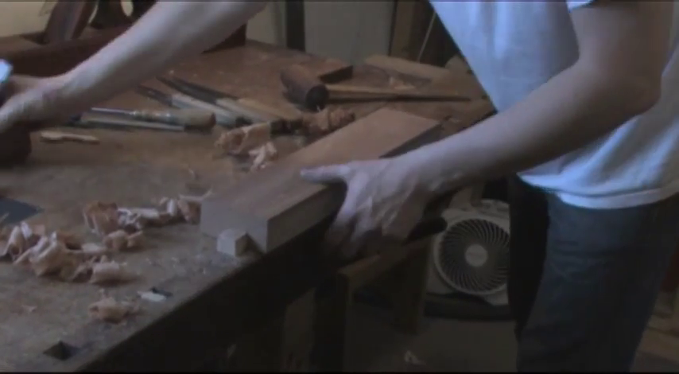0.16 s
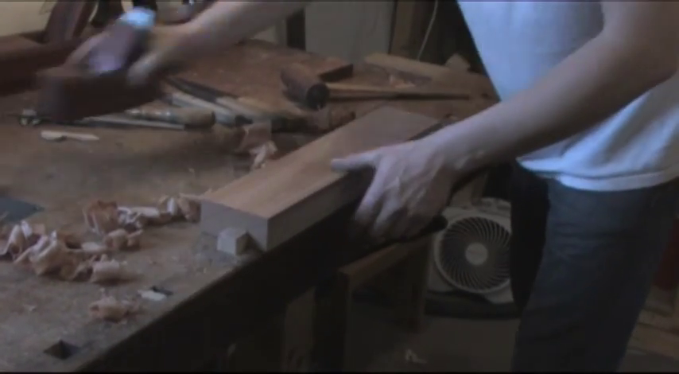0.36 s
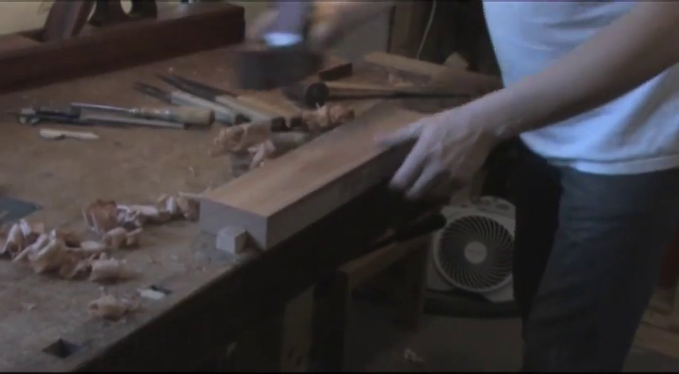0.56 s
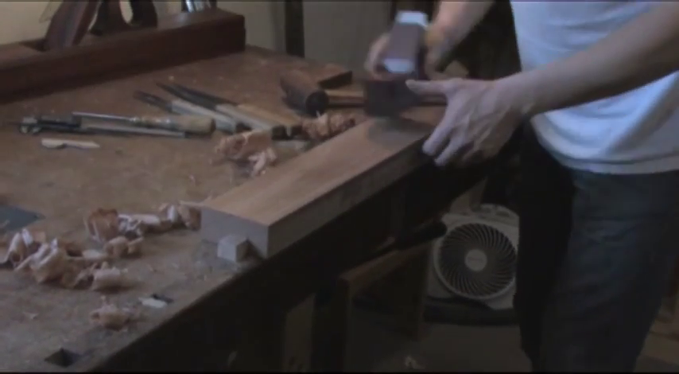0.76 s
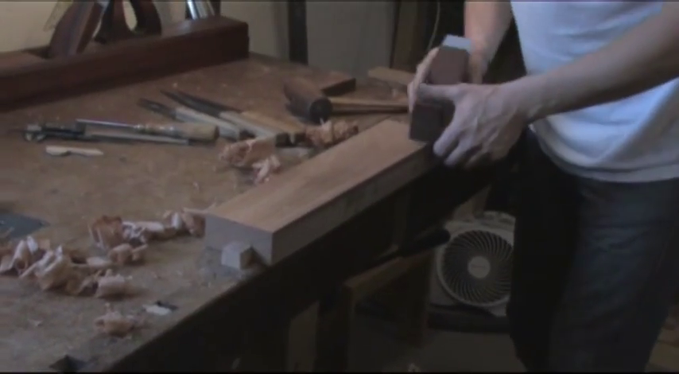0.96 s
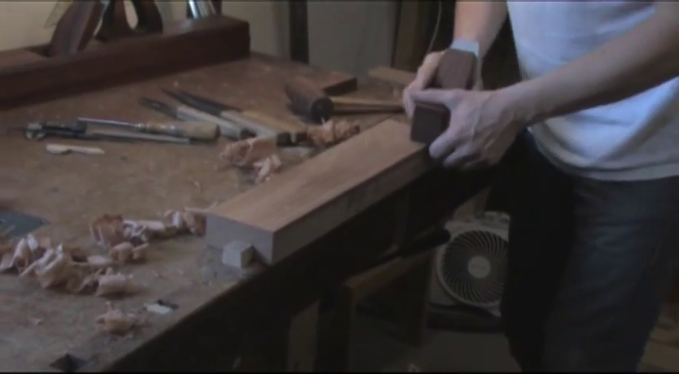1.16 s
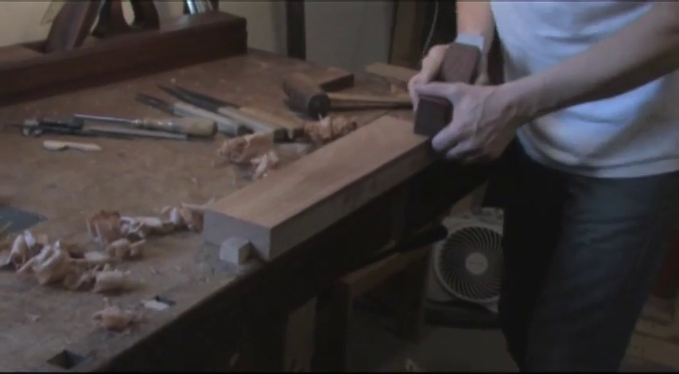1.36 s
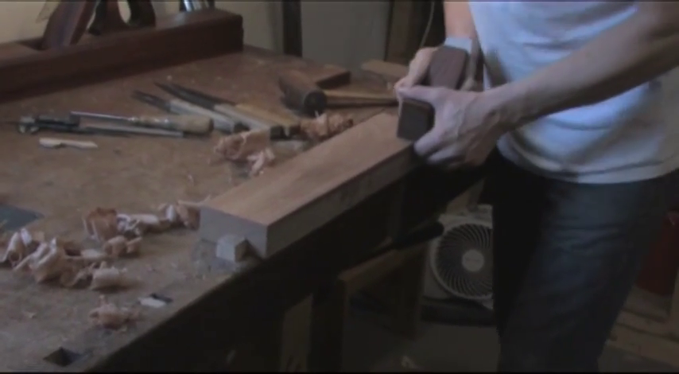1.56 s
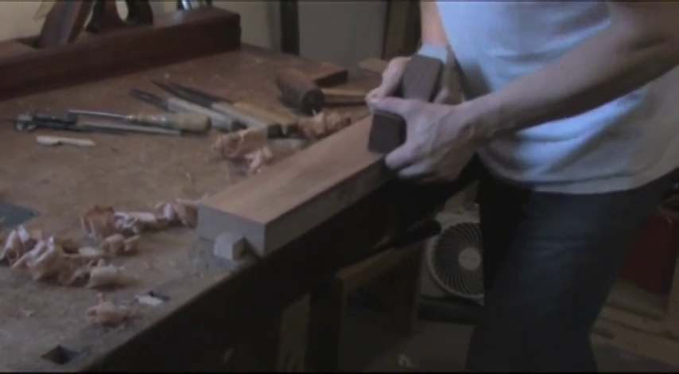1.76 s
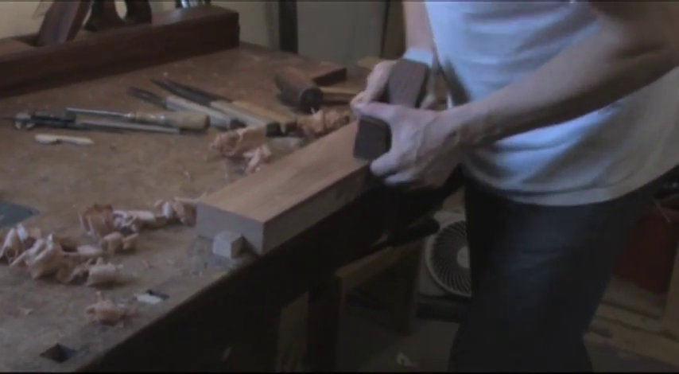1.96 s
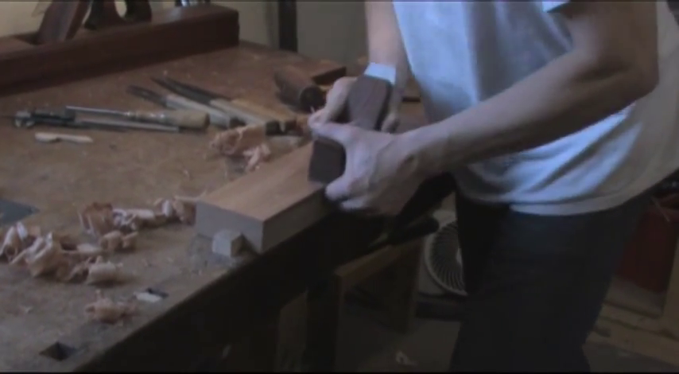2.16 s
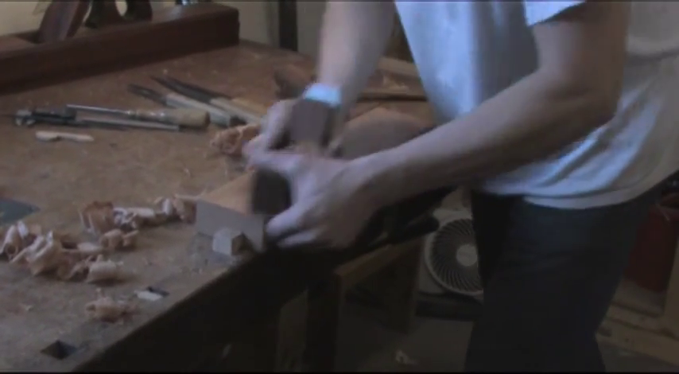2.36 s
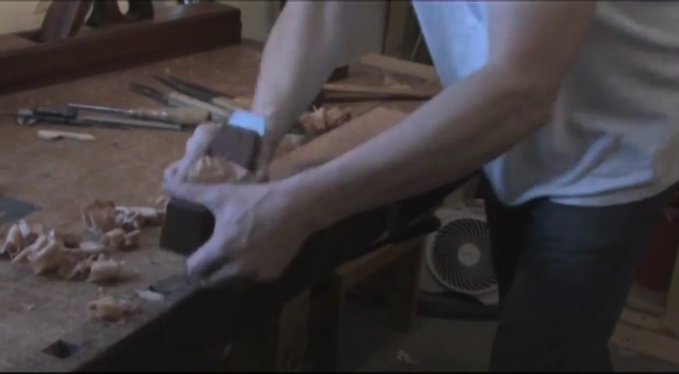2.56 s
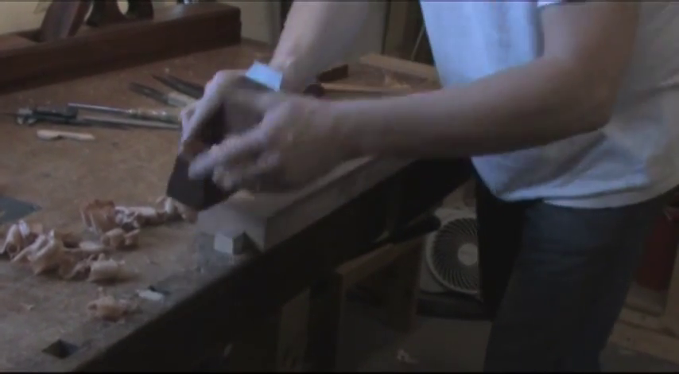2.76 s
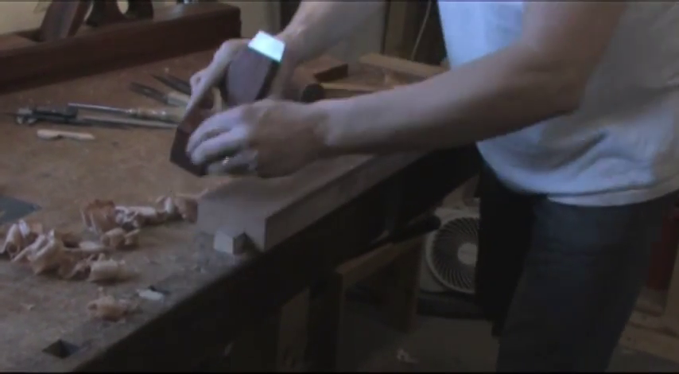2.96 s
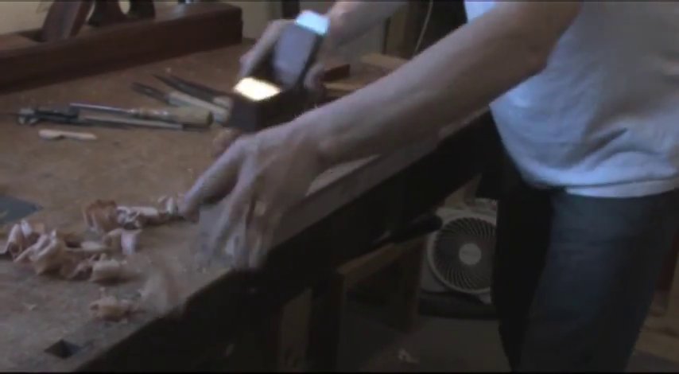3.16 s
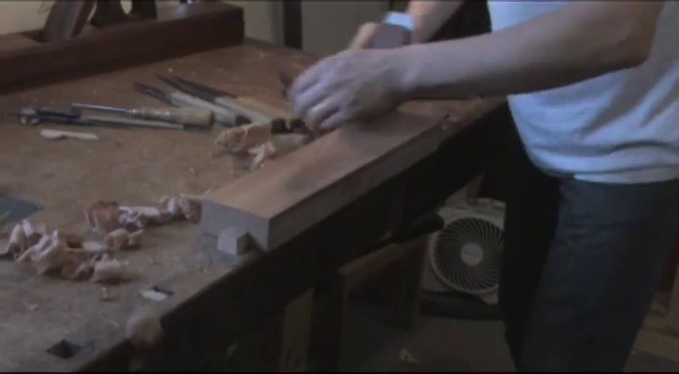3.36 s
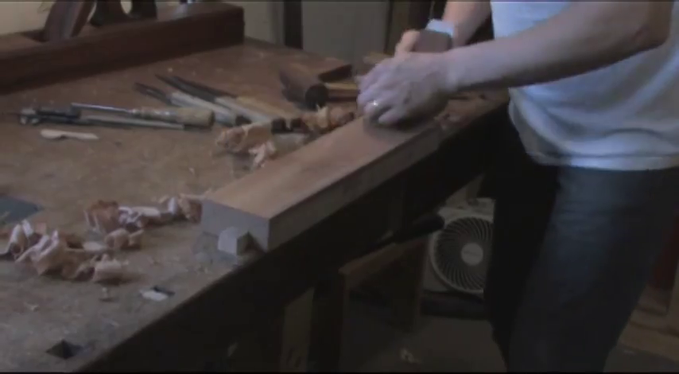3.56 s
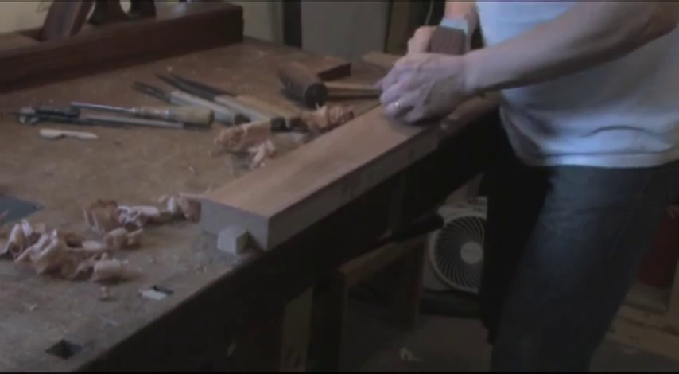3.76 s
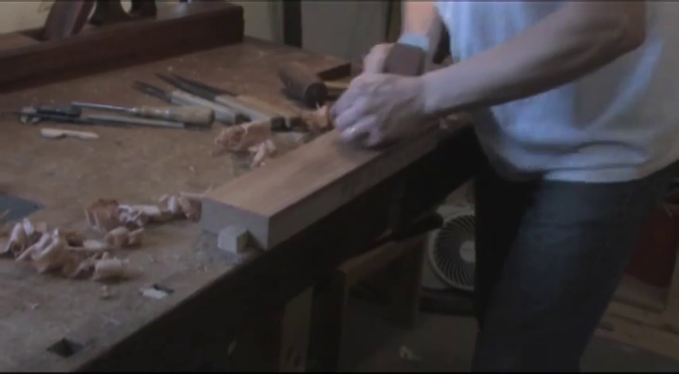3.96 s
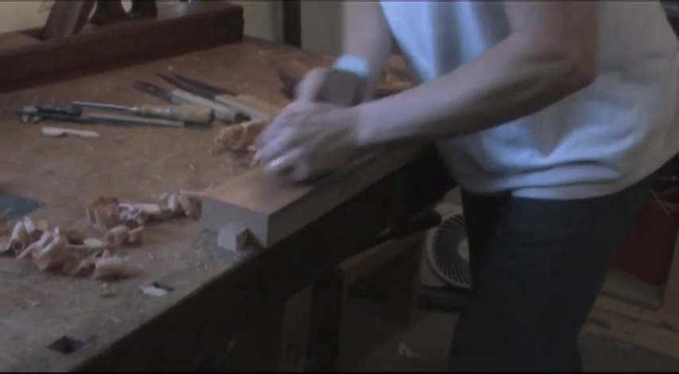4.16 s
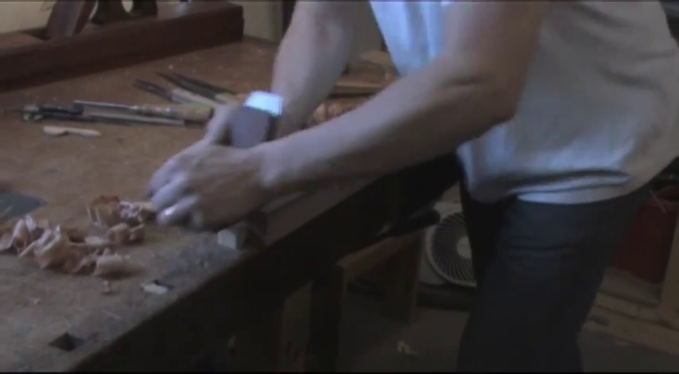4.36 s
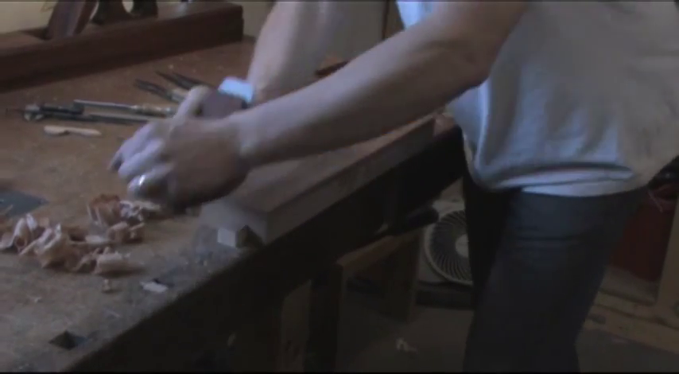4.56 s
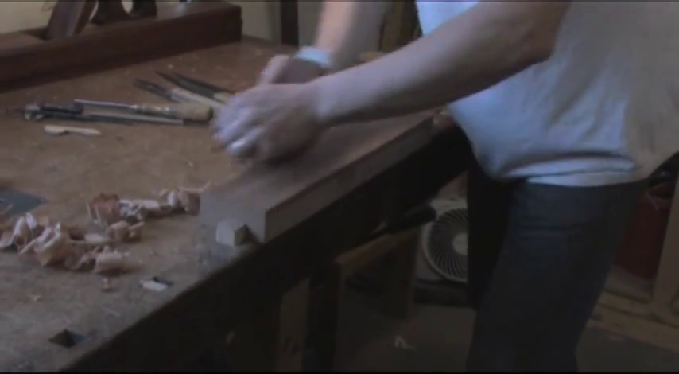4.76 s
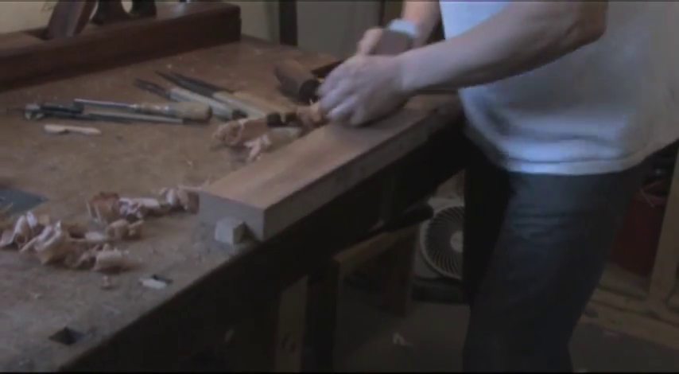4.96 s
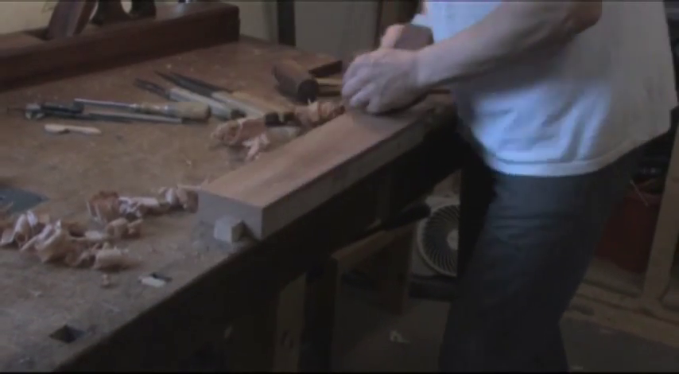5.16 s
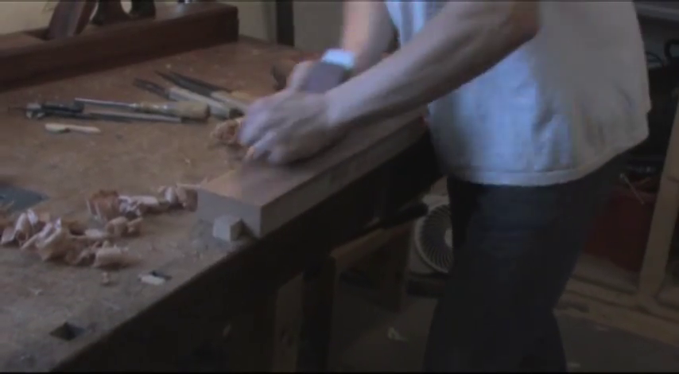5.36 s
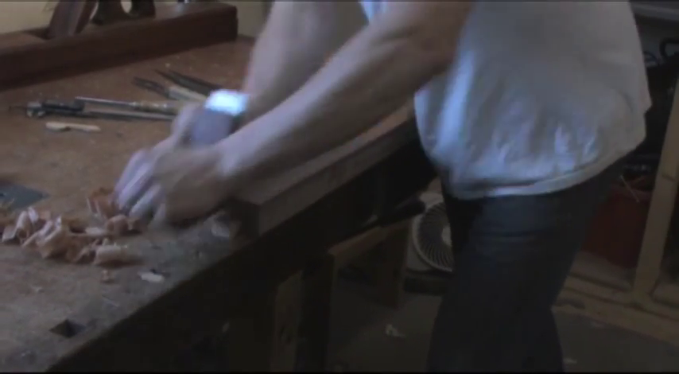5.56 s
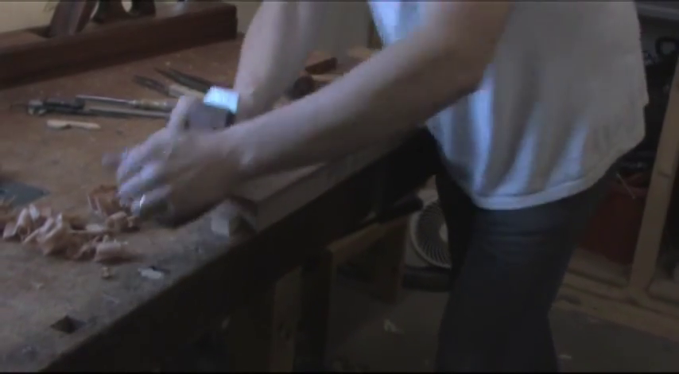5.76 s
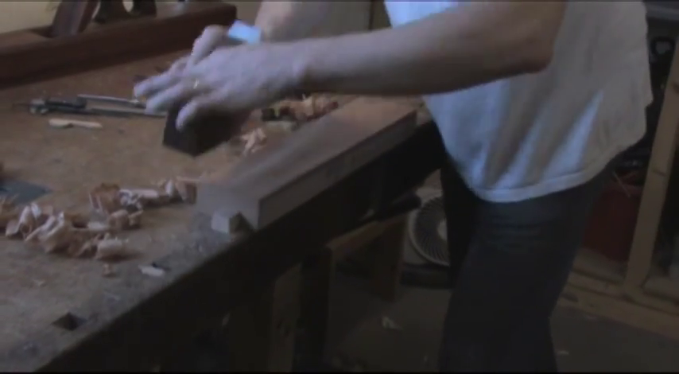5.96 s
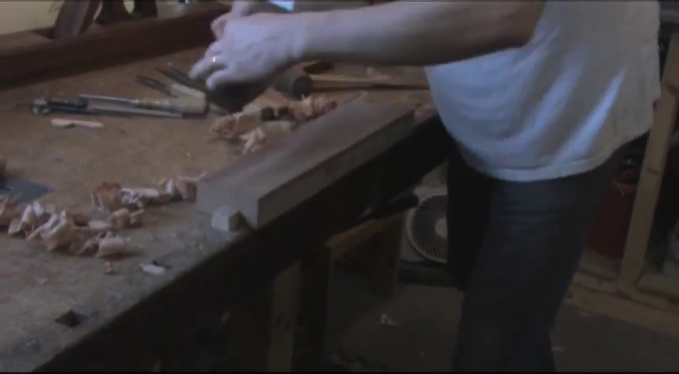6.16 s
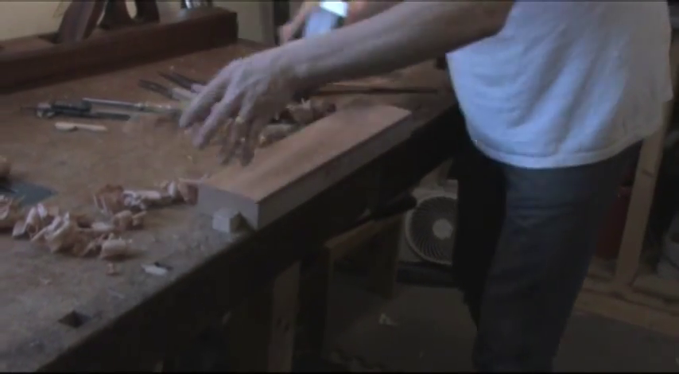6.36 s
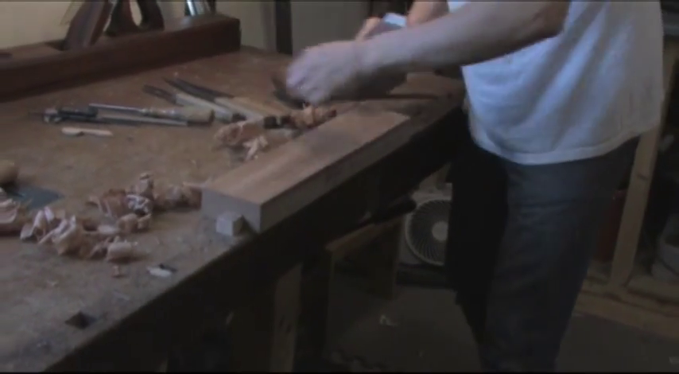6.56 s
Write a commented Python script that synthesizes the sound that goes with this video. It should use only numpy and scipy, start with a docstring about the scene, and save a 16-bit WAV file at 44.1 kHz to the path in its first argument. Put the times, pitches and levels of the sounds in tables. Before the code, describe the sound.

A wooden hand plane knocks onto a board and pushes through in three hissing, hollow-toned strokes, over a low fan hum in a small workshop.

```python
"""A wooden hand plane is set down on a board and pushed along it in strokes, in a small workshop.
The iron tears fibres, heard as shaped random slips; the plane's throat resounds as a gliding resonance.
Knocks ring the modes of plane, board and bench; hands and shavings rustle, fibres snap, a whistle falls.
A fan hums and wavers under a steady air hiss, and sparse decaying echoes give the work a short tail."""
import sys
import numpy as np
from scipy import signal
from scipy.io import wavfile
from scipy.ndimage import uniform_filter1d

SR = 44100
rng = np.random.default_rng(int(sys.argv[2]) if len(sys.argv) > 2 else 0)


def waveform_to_disk(signal):
    """Save audio, clipped to [-1, 1], as 16-bit WAV at the path in sys.argv[1]."""
    frames = np.transpose(np.atleast_2d(signal))
    scaled = np.clip(frames, -1, 1) * 32767
    samples = np.round(scaled).astype(np.int16)
    wavfile.write(sys.argv[1], SR, samples)


N = 291060  # length in samples

# Levels of the working sounds are relative: the mix in scene() sets the final balance.
# Rustles and light slides: start_s, rise_s, hold_s, level_db, treble_tilt_db_per_octave,
# plane_ringing_db (re level)
RUSTLE_EVENTS = [(0.0, 0.0021, 0.03, -58, -2.5, -16), (0.148, 0.0095, 0.02, -58, 5, -16),
                 (0.233, .044, 0.32, -56, 0.5, -13), (0.746, 0.043, 0.035, -43.5, 1, -11),
                 (0.96, 0.01, 0.068, -45, -5.5, -20), (1.265, .038, .06, -53.5, -3, -1),
                 (1.418, 0.083, .003, -50, -5.5, -12), (2.934, 0.045, .028, -51.5, 0.5, -17),
                 (3.14, .014, .003, -56, 4, -15), (3.216, 0.0067, .003, -46.5, 1.5, -10),
                 (3.317, 0.0065, .003, -49, 0.5, -17), (3.866, 0.074, 0.058, -43.5, -6.5, -10),
                 (4.905, 0.0096, 0.1, -43, -3, -23), (5.026, 0.021, .003, -37.5, -0.5, -21),
                 (5.075, 0.027, 0.032, -41.5, -7, -7), (5.215, 0.035, .003, -49, -10, -17),
                 (5.932, 0.099, 0.0035, -57.5, -3.5, -12), (6.092, .024, 0.18, -49.5, 1, -11),
                 (6.36, 0.015, 0.0027, -51, 3.5, -14), (6.484, .062, .003, -59, 2.5, -14)]
# The plane lands, bites or leaves the board, or the bench is bumped: time_s, level_db, legs_db,
# bench_top_db, crack_db (these three re level), favoured_pitch_hz, falloff_db_per_squared_octave,
# contact_time_constant_s
KNOCK_EVENTS = [(0.156, -38, -1.5, -7, -14, 224, 3.5, 0.0039), (0.234, -52.5, -7, 26, -17, 221, 12, 0.0028),
                (0.323, -44.5, -26, 1, -10, 275, 6, 0.0024),
                (0.966, -5.5, -30.5, -32, -19.5, 704, 1.5, 0.00077),
                (1.22, -27.5, -24, -29, -20, 275, 1.5, 0.0014),
                (1.401, -37, -24, -20, -25, 586, 10, 0.0043),
                (1.516, -25.5, -17, -20, -29, 221, 1.5, 0.0066),
                (1.645, -31, -22, -12, -29, 716, -3.5, 0.0032),
                (2.149, -25.5, -13, -23, -8, 825, 1.5, 0.0044),
                (2.257, -26, -33, -32, -24, 856, 12, 0.0043),
                (2.514, -20.5, -18, -19.5, -8, 231, 2.5, 0.0031),
                (3.66, 0.5, -34, -27.5, -11, 910, 2, 0.00031),
                (4.367, -18, -17.5, -15.5, -25, 810, 2.5, 0.0021),
                (4.432, -17, -22, -15.5, -10.5, 235, 2.5, 0.0013),
                (4.909, -3.5, -42, -19, -20.5, 456, 3.5, 0.0027),
                (5.277, -19.5, -30, -13.5, 1.5, 760, -0.5, 0.0016),
                (5.614, -16.5, -20.5, -11.5, -7, 670, -0.5, 0.0029),
                (5.958, -50.5, -23, -23, -25, 890, 14.5, 0.0028)]
# Dry shavings and fibres snap: time_s, peak_db, centre_hz
SNAP_EVENTS = [(0.7544, -42, 4780), (1.514, -33, 7140), (3.2207, -31.5, 5200), (3.323, -39, 4620),
               (4.1155, -31, 7000), (5.2817, -6.5, 2950), (6.027, -45, 3000), (6.123, -43, 4500),
               (6.245, -40, 4500), (6.298, -39.5, 2600), (6.4837, -44, 2500), (6.547, -36.5, 5000)]
# Modes of legs, bench top, board and plane, in rising pitch: pitch_hz, level_db, t60_s
WOOD_MODES = [(66.2, 0, 0.36), (77.5, -3.5, 0.47), (134.8, -3, 0.24), (168, -12.5, 0.086),
              (235.3, -3.5, 0.16), (284, -6.5, 0.14), (322.7, -4, 0.1), (372.4, 0, 0.1), (452.3, 2.5, 0.15),
              (526, -1.5, 0.11), (555.6, -4.5, 0.088), (610.6, -3, 0.063), (673.2, -3, 0.11),
              (730.4, -4, 0.08), (787, 0.5, 0.045), (890, 2.5, 0.036), (992.6, 4, 0.057), (1079, 6, 0.035),
              (1242, 2.5, 0.045), (1472, 5.5, 0.077), (2160, 11.5, 0.035), (2728, 3, 0.074),
              (3684, 4, 0.09), (4800, -1.5, .03), (5730, -16, .025), (7100, -25, 0.021)]
# Spectrum of torn fibres: frequency_hz, density_db (per Hz)
TEAR_SPECTRUM = [(1650, -47), (2800, -1), (3310, -3), (4180, 3.5), (4840, 3.5), (7120, -3), (7490, -1),
                 (8360, -5), (9890, -5.5), (13600, -12.5), (16000, -26.5)]
# Resonances of the iron, raising the tearing spectrum: centre_hz, width_hz, lift_db
IRON_RESONANCES = [(4750, 400, 4.5), (6590, 1100, 8.5), (6970, 310, 5.5), (8300, 650, 6.5),
                   (9100, 200, 5.5), (11600, 500, 1)]
# Spectrum of the rubbing sole: frequency_hz, density_db (per Hz)
RUB_SPECTRUM = [(530, -13.5), (900, 0), (1150, -74), (1380, 0), (1490, -5.5), (1980, -7.5), (2360, 1),
                (3300, -9.5), (4500, -6), (5850, 2), (9900, -120)]
# Spectrum of brushed wood: frequency_hz, density_db (per Hz)
RUSTLE_SPECTRUM = [(290, -13.5), (500, -3.5), (1000, -7.5), (1950, -6.5), (4470, -5.5), (12700, -16.5),
                   (16000, -25)]
# Spectrum of the air and microphone hiss: frequency_hz, density_db (per Hz)
AIR_SPECTRUM = [(12, -38.5), (20, -22.5), (96, -15.5), (134, -43.5), (154, -6), (177, -16), (228, -23),
                (285, -19), (357, -33.5), (642, -32), (698, -33), (1370, -41.5), (5680, -43), (14700, -45),
                (16000, -46)]
AIR_DB = -52
# Steady motor tones: pitch_hz, level_db (rms)
HUM_TONES = [(150.2, -43)]
# Wavering bands of the fan: centre_hz, width_hz (of each of two passes), level_db (rms)
FAN_BANDS = [(124.7, 13, -49), (164, 3, -71.5), (32.4, 38.5, -60), (372, 59, -67)]
# Reverberation of the shop: frequency_hz, t60_s
SHOP_DECAY = [(60, 0.38), (260, 0.59), (700, 0.44), (1840, 0.46), (4850, 0.41), (12000, 0.23)]
# Pushes of the plane: start_s, rise_s, hold_s, tearing_db, drift_over_hold_db,
# treble_tilt_db_per_octave, sole_rub_db (re tearing), throat_rise_s, throat_db, throat_drift_db,
# throat_start_hz, throat_end_hz
PUSH_EVENTS = [(1.503, 0.011, 0.036, -41, 3, -4.5, -6.5, 0.01, -38.5, 5.5, 690, 686),
               (1.64, 0.16, 0.092, -29.5, -9, 2, 1, 0.033, -31, 6, 723, 886),
               (1.972, 0.069, 0.074, -36, -8, 7.5, 3, 0.022, -27.5, -7, 860, 796),
               (2.109, 0.04, 0.041, -37, -2.5, 0, 3, 0.037, -31.5, 1, 885, 822),
               (2.27, 0.053, .2, -30.5, -7, 6.5, -1, 0.013, -26, -9.5, 868, 832),
               (3.931, 0.029, .45, -39, 12, 7, -1.5, 0.022, -27.5, -3, 855, 710),
               (4.497, 0.027, 0.034, -58.5, -8, -11, 10.5, .035, -31.5, -5, 780, 862),
               (5.274, 0.0055, 0.034, -25, -26, -19.5, -2, 0.0074, -31.5, -1, 840, 750),
               (5.332, 0.038, 0.25, -37, -2, 12.5, 3, 0.16, -24, -11, 813, 722)]
# The iron catches and the shaving rips louder for a moment: start_s, rise_s, peak_db
CATCH_EVENTS = [(2.13, .018, -23.5), (2.46, .036, -24), (4.107, 0.018, -26.5), (4.19, 0.033, -27.5),
                (4.37, 0.0093, -45), (5.592, 0.015, -22)]
# A faint falling whistle as the first pass ends: start_s, rise_s, hold_s, level_db, first_hz, last_hz
SQUEAK_GLIDE = (2.535, .015, .08, -41, 1680, 1270)

EDGE_HZ = 15850  # upper band limit
LEGS_TOP_HZ, BENCH_TOP_HZ, BOARD_TOP_HZ = 100, 200, 1400  # upper limits of the mode groups
PUSH_RISE_DB, PUSH_FALL_DB_PER_S = 22.5, 502  # climb and fall of the tearing
THROAT_RISE_DB, THROAT_FALL_DB_PER_S = 12.5, 271
SHAKE_DB = -18  # shaking of the legs, re throat
CATCH_RISE_DB, CATCH_FALL_DB_PER_S, CATCH_TILT_DB_PER_OCTAVE = 17, 452, 3.4
RUSTLE_RISE_DB, RUSTLE_SAG_DB_PER_S, RUSTLE_FALL_DB_PER_S = 21.5, -20, 307
PLACE = 0.292  # where blows fall on the standing waves of the board
SNAP_WIDTH = 1.4  # bandwidth of each filter pass, as a multiple of the centre pitch


def gain_of(db):
    """Amplitude ratio: twenty decibels are a factor of ten."""
    return 10 ** (np.asarray(db) / 20)


def evened(x):
    """Normalisation of power: scales x to rms 1."""
    return x / np.sqrt(np.mean(x ** 2) + 1e-20)


def read(points, hz):
    """Interpolation of a curve along a logarithmic frequency axis."""
    f, value = np.transpose(points)
    return np.interp(np.log(hz + 1), np.log(f + 1), value)


def add(mix, s, sound):
    """Superposition: adds a sound to the mix, in place, at second s."""
    part = mix[max(round(s * SR), 0):][:len(sound)]
    part += sound[:len(part)]


def swell(start, rise, hold, db, rise_db, drift_db, fall_db_per_s):
    """Exponential envelope, straight in decibels: silence, climb, drifting hold, steady fall."""
    t = np.arange(N) / SR - start
    rise, hold = max(rise, .001), max(hold, .001)
    level_db = np.interp(t, [0, rise, rise + hold], [db - rise_db, db, db + drift_db])
    fall_db = fall_db_per_s * np.clip(t - rise - hold, 0, 1)
    return gain_of(level_db - fall_db) * (t >= 0)


def blend(gains, values):
    """Weighted mean: the louder event dominates the value."""
    return sum(g * v for g, v in zip(gains, values)) / (sum(gains) + 1e-12)


def resonate(x, hz, width):
    """Resonance by heterodyne: shifts the curve hz to zero, smooths, shifts back; peak gain 1."""
    turn = np.exp(2j * np.pi * np.cumsum(hz * np.ones(len(x))) / SR)
    r = np.exp(-np.pi * width / SR)
    smoothed = signal.lfilter([1 - r], [1, -r], x / turn + 1e-18)
    return 2 * (turn * smoothed).real


def fibres(per_s, spread_db):
    """Stick-slip friction as a random train of tiny slips, a few of them large."""
    size = gain_of(spread_db * np.minimum(rng.exponential(1, N), 3.5))
    happens = rng.random(N) < per_s / SR
    return evened(size * rng.standard_normal(N) * happens)


def colour(x, shape_db, tilt=0, patchy_db=0, size=512):
    """Spectral filtering by shape_db(hz), a moving tilt about 6 kHz and drifting random patches."""
    hz, t, z = signal.stft(x, SR, nperseg=size, noverlap=size * 3 // 4)
    patches = rng.standard_normal(z.T.shape).T
    patches = uniform_filter1d(patches, size=7, axis=0)
    patches = evened(uniform_filter1d(patches, size=12, axis=1))
    steady = gain_of(shape_db(hz))[:, None]
    octaves = np.log2(np.maximum(hz, 2000) / 6000)[:, None]  # the tilt is level below 2 kHz
    slope_db = octaves * np.interp(t * SR, np.arange(N), tilt * np.ones(N))
    z = z * steady * gain_of(slope_db + patchy_db * patches) / np.sqrt(np.mean(steady ** 2))
    return signal.istft(z, SR, nperseg=size, noverlap=size * 3 // 4)[1][:N]


def ring(lo_hz, hi_hz, place=0., favoured_hz=600., fall_db=0.):
    """Modal superposition after one blow: modes with a node near the blow are weak; peak 1."""
    modes = [m for m in WOOD_MODES if lo_hz < m[0] < hi_hz]
    hz, db, t60 = np.transpose(modes)[:, :, None]
    t = np.arange(SR // 2) / SR
    # bending waves shorten as the root of pitch
    shape = .5 + np.cos(2 * np.pi * place * np.sqrt(hz / 60.)) ** 2
    sign = (-1.) ** np.arange(len(hz))[:, None]  # neighbouring modes swing in opposite senses
    level_db = db - fall_db * np.log2(hz / favoured_hz) ** 2 - 60 * t / t60
    sound = (sign * shape * gain_of(level_db) * np.sin(2 * np.pi * hz * t)).sum(0)
    return sound / abs(sound).max()


def background():
    """Steady sources: sinusoidal motor hum, narrowband fan noise and broadband air and microphone hiss."""
    t = np.arange(N) / SR
    hum = sum(gain_of(db) * np.sqrt(2) * np.sin(2 * np.pi * (hz * t + rng.random()))
              for hz, db in HUM_TONES)
    fan = np.zeros(N)
    for hz, width, db in FAN_BANDS:
        band = resonate(resonate(rng.standard_normal(N), hz, width), hz, width)
        fan += gain_of(db) * evened(band)
    air = colour(rng.standard_normal(N), lambda hz: read(AIR_SPECTRUM, hz), patchy_db=-2.0, size=4096)
    return hum + fan + gain_of(AIR_DB) * air


def rustles():
    """Friction noise: skin, shavings and sole brush wood, and the sliding excites faint plane modes."""
    gains = [swell(s, rise, hold, db, RUSTLE_RISE_DB, RUSTLE_SAG_DB_PER_S * hold, RUSTLE_FALL_DB_PER_S)
             for s, rise, hold, db, _, _ in RUSTLE_EVENTS]
    *_, tilts, ring_db = np.transpose(RUSTLE_EVENTS)
    tilt = blend(gains, tilts)
    brush = colour(fibres(5000, 0.62), lambda hz: read(RUSTLE_SPECTRUM, hz), tilt, patchy_db=2.5)
    body = evened(signal.oaconvolve(fibres(3000, 1.3), ring(BOARD_TOP_HZ, SR))[:N])
    return sum(gains) * brush + gain_of(ring_db) @ gains * body


def knocks():
    """Impact: fibres crush, board and plane ring as contact builds, the heavy bench swells slowly."""
    light, heavy, t = np.zeros(N), np.zeros(N), np.arange(SR // 2) / SR
    grit_band = signal.butter(2, [1250., 3100.], "band", fs=SR, output="sos")
    for s, db, legs_db, top_db, crack_db, favoured_hz, fall_db, contact in KNOCK_EVENTS:
        board = ring(BENCH_TOP_HZ, BOARD_TOP_HZ, PLACE, favoured_hz, fall_db)
        board = board * (1 - np.exp(-t / contact))
        board = board / abs(board).max()
        top = gain_of(top_db) * ring(LEGS_TOP_HZ, BENCH_TOP_HZ, PLACE) * (1 - np.exp(-t / 0.003))
        legs = gain_of(legs_db) * ring(0, LEGS_TOP_HZ, PLACE) * (1 - np.exp(-t / 0.024)) ** 2
        grit = rng.standard_normal(len(t)) * (1 - np.exp(-t / 0.0021)) * np.exp(-t / 0.018)
        grit = signal.sosfilt(grit_band, grit)
        gripped = ring(BOARD_TOP_HZ, SR, PLACE) * np.exp(-t / 0.0095)  # the hands damp the plane
        crack = gain_of(crack_db) * (0.77 * gripped + 1.28 * grit)
        start = s - .0006
        add(light, start, gain_of(db) * (gain_of(-1.0) * board + crack))
        add(heavy, start, gain_of(db) * (gain_of(2.5) * top + gain_of(6.0) * legs))
    return light, heavy


def snaps():
    """Brief release of strain: a decaying noise burst gives a wide click round a centre pitch."""
    out, t = np.zeros(N), np.arange(400) / SR
    for s, db, hz in SNAP_EVENTS:
        click = rng.standard_normal(len(t)) * np.exp(-t / 0.00048)
        click = resonate(resonate(click, hz, SNAP_WIDTH * hz), hz, SNAP_WIDTH * hz)
        add(out, s, gain_of(db) * click / abs(click).max())
    return out


def tearing_db(hz):
    """Resonant emphasis: each iron resonance lifts the spectrum of torn fibres."""
    lift = sum(db / (1 + (2 * (hz - f) / width) ** 2) for f, width, db in IRON_RESONANCES)
    return read(TEAR_SPECTRUM, hz) + lift


def strokes():
    """Friction-driven resonance: a push tears fibres, rubs the sole, sounds the throat, shakes the bench."""
    cuts, tilts, rubbing, voices, pitches = [], [], 0, [], []
    for (s, rise, hold, db, drift_db, tilt, rub_db,
         throat_rise, throat_db, throat_drift_db, first_hz, last_hz) in PUSH_EVENTS:
        cut = swell(s, rise, hold, db, PUSH_RISE_DB, drift_db, PUSH_FALL_DB_PER_S)
        cuts.append(cut)
        tilts.append(tilt)
        rubbing = rubbing + gain_of(rub_db) * cut
        throat_hold = rise + hold - throat_rise
        voices.append(swell(s, throat_rise, throat_hold, throat_db,
                            THROAT_RISE_DB, throat_drift_db, THROAT_FALL_DB_PER_S))
        pitches.append(np.interp(np.arange(N) / SR, [s, s + rise + hold], [first_hz, last_hz]))
    for s, rise, db in CATCH_EVENTS:
        cuts.append(swell(s, rise, 0, db, CATCH_RISE_DB, 0, CATCH_FALL_DB_PER_S))
        tilts.append(CATCH_TILT_DB_PER_OCTAVE)
    tear = colour(fibres(14000, 0.38), tearing_db, blend(cuts, tilts), patchy_db=1.5)
    rub = colour(fibres(6000, 1.7), lambda hz: read(RUB_SPECTRUM, hz), patchy_db=3.5)
    chatter = fibres(900, 1.76)  # drives throat and board alike
    throat = evened(resonate(chatter, blend(voices, pitches) + 1, 57.0))
    board = evened(signal.oaconvolve(chatter, ring(BENCH_TOP_HZ, BOARD_TOP_HZ))[:N])
    voice = sum(voices) * (gain_of(-0.5) * throat + gain_of(-7.5) * board)
    shake = gain_of(SHAKE_DB) * sum(voices) * rng.standard_normal(N)
    legs = ring(0, LEGS_TOP_HZ)
    bench = signal.oaconvolve(shake, legs / np.linalg.norm(legs))[:N]
    return sum(cuts) * tear + rubbing * rub + voice + bench


def squeak():
    """Narrowband noise: two passes of a falling resonance leave a rough tone that slides down."""
    s, rise, hold, db, first_hz, last_hz = SQUEAK_GLIDE
    hz = np.interp(np.arange(N) / SR, [s, s + rise + hold], [first_hz, last_hz])
    tone = evened(resonate(resonate(rng.standard_normal(N), hz, 70.), hz, 70.))
    return swell(s, rise, hold, db, PUSH_RISE_DB, -3.7, PUSH_FALL_DB_PER_S) * tone


def shop(x):
    """Reverberation: sparse echoes of random sign, each band decaying at its own speed."""
    taps = np.zeros(SR)
    at = np.arange(260, SR - 20, 20) + rng.integers(0, 20, (SR - 261) // 20)
    early_db = 2.0 / (1 + np.exp((at / SR - .085) / 0.022))  # near walls lift the first echoes
    taps[at] = rng.choice([-1., 1.], at.shape) * gain_of(early_db)
    hz, t, z = signal.stft(taps, SR, nperseg=256)
    decay = gain_of(-60 * t / read(SHOP_DECAY, hz)[:, None])
    tail = signal.istft(z * decay, SR, nperseg=256)[1]
    return signal.fftconvolve(x, tail / np.linalg.norm(tail))[:N]


def scene():
    """Superposition of direct and reverberant work at the bench, over the background."""
    rubbing = strokes() + rustles() + squeak()
    blows, thuds = knocks()
    ticks = snaps()
    room = shop(gain_of(-9.5) * rubbing + gain_of(-1.0) * blows + gain_of(-2.5) * thuds
                + gain_of(-6.5) * ticks)
    work = gain_of(-2.0) * rubbing + gain_of(2.0) * blows + thuds + gain_of(3.5) * ticks + room
    # a high-pass removes rumble below the lowest modes of the legs
    rumble_free = signal.sosfilt(signal.butter(4, 48., "high", fs=SR, output="sos"), work)
    return (rumble_free + background())[None]


def record(dry):
    """Saturation and band limit: the input clips at full scale, then a low-pass removes the top."""
    clipped = np.clip(dry, -1, 1)
    low_pass = signal.firwin(511, EDGE_HZ, window=("kaiser", 9), fs=SR)
    return signal.oaconvolve(clipped, low_pass[None], "same")


dry = scene()
out = record(dry)
waveform_to_disk(out)
```